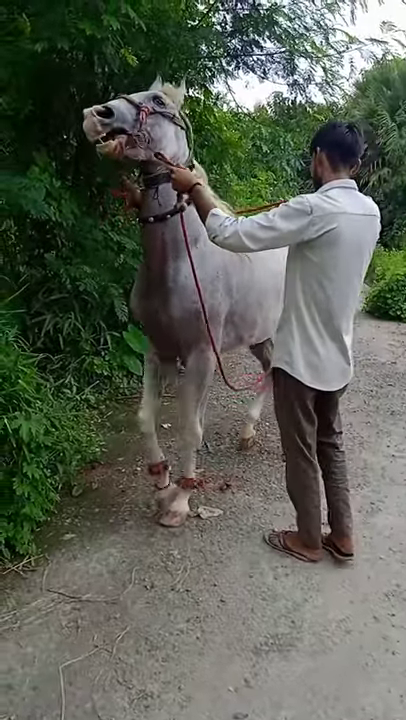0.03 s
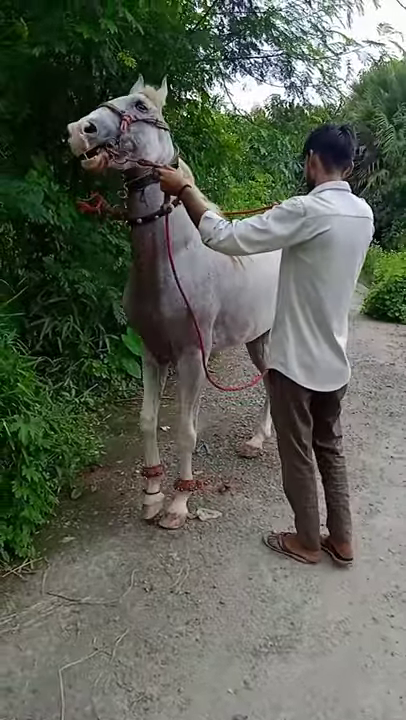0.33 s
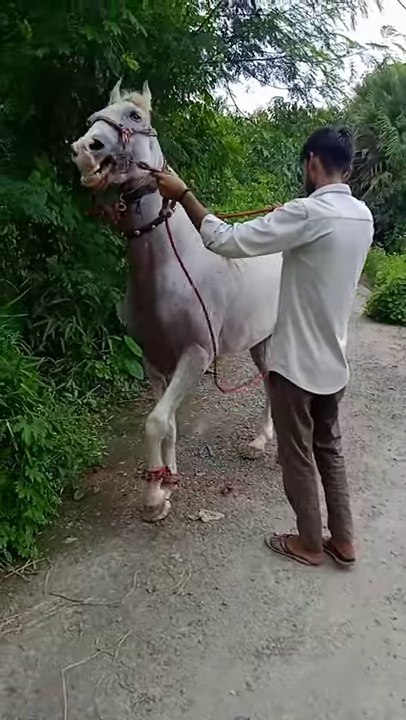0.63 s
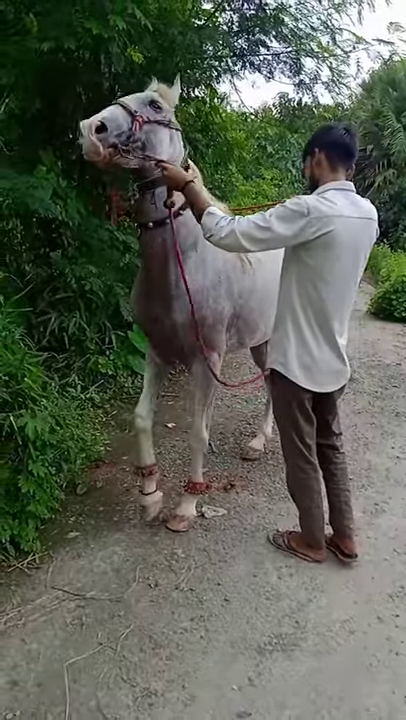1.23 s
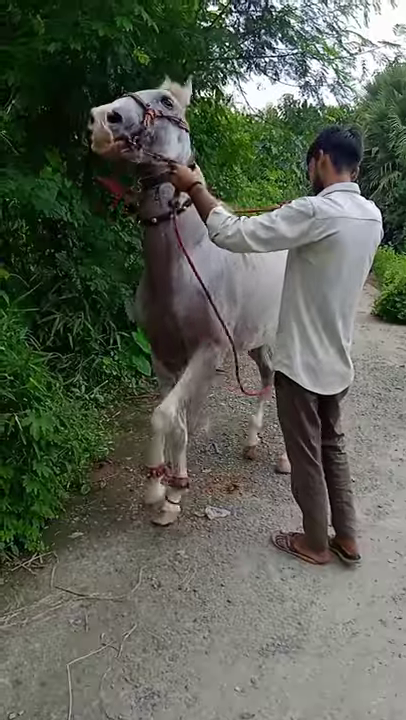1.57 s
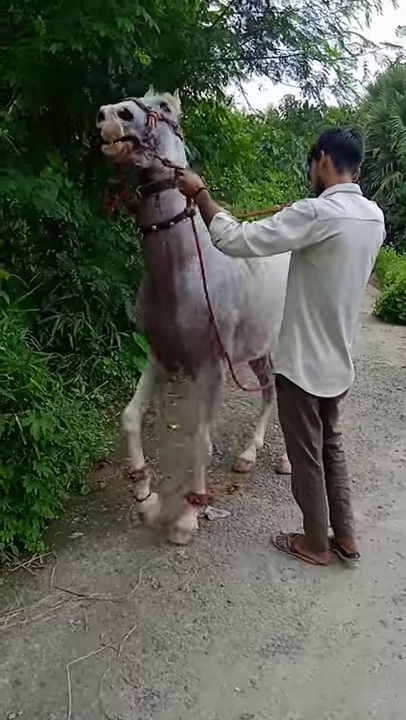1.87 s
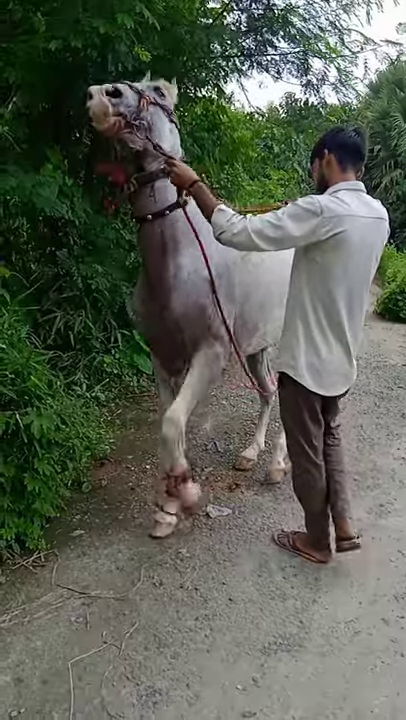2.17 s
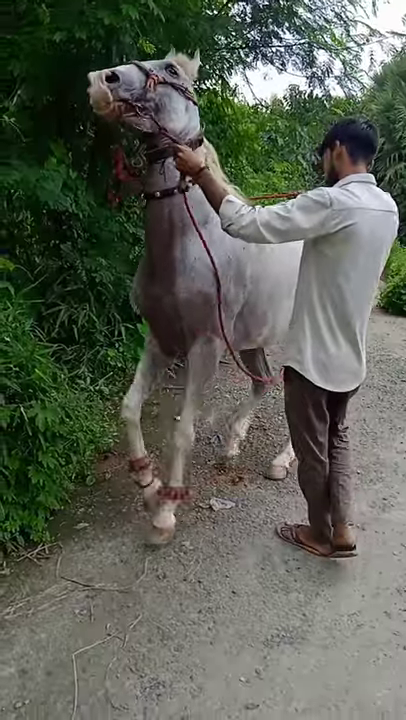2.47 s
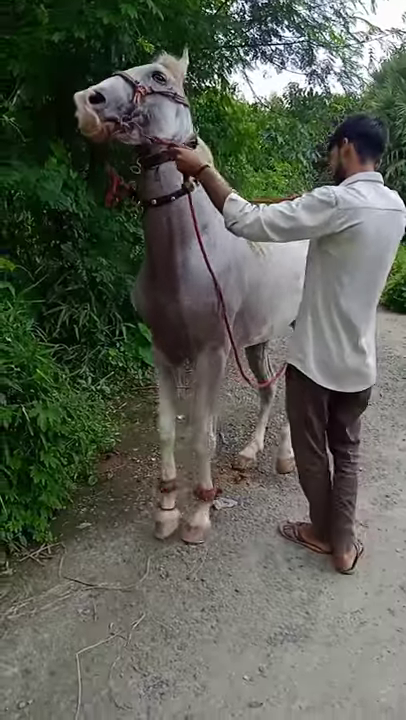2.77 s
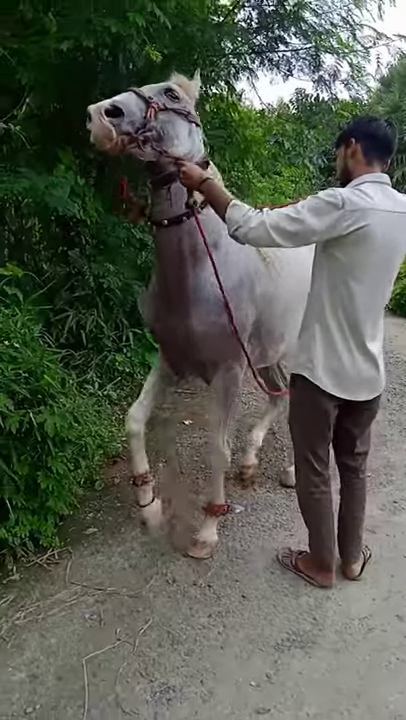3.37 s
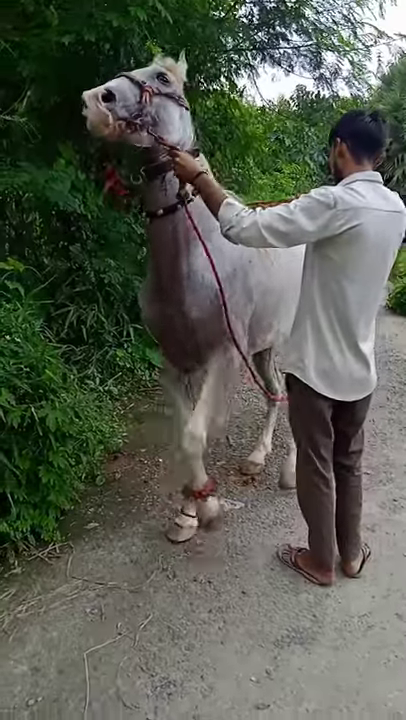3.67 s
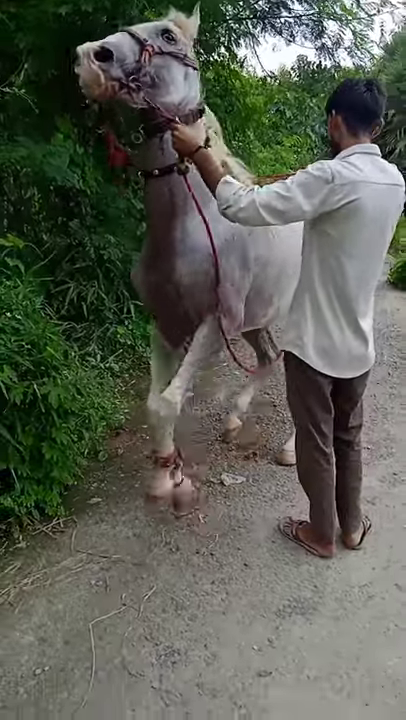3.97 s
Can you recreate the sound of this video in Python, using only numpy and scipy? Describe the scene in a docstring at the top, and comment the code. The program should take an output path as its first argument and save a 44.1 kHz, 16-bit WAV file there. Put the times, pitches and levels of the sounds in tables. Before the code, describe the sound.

Small bells on a prancing horse's legs jingle brightly throughout, in shakes about every 0.4 seconds. Hooves knock and scuff on a gritty path, lightly at first and firmer from 1.8 seconds. The bells clash harder at about 1.4 and 2.1 seconds. Short snorts follow the steps from 0.5 seconds on. A small stone clicks near 3.1 seconds. Faint high peeps and quiet open air lie behind.

```python
"""Small pellet bells jingle on the forelegs of a horse prancing on the spot on a gritty path.
Each step shakes the pellets against their shells; hard landings bang the bells together.
The hooves knock and scuff the grit, and the horse puffs short snorts in time with its steps.
Faint high peeps and quiet open air lie behind; bushes scatter a weak echo."""
import sys
import numpy as np
from scipy import signal
from scipy.io import wavfile
from scipy.ndimage import uniform_filter1d

SR = 44100
rng = np.random.default_rng(int(sys.argv[2]) if len(sys.argv) > 2 else 0)


def output_pcm(signal):
    """Save a mono or channel-first signal as 16-bit PCM at the path in sys.argv[1].

    Samples are clipped to [-1, 1] before scaling.
    """
    pcm = np.clip(np.atleast_2d(signal).T, -1, 1) * 32767
    wavfile.write(sys.argv[1], SR, np.round(pcm).astype(np.int16))


N = 176400

# strongest bell modes: f/Hz, level/dB
BELL_MODES = [(5210, -5), (5480, -15), (5890, -10), (6290, 1), (6480, 3.5), (6830, -1), (7100, 2),
              (7245, 0), (7420, 3.5), (7485, 5.5), (7740, -0.5), (7905, 5.5), (8120, 2.5), (8440, 2.5),
              (8660, 4), (8950, -1), (9250, -1), (9920, -3.5), (11250, -9.5), (12020, -16), (14050, -10),
              (14560, -12), (15000, -5), (15340, -3), (15700, 1.5)]
# envelope of the weaker shell modes: f/Hz, level/dB
SHELL_SPECTRUM = [(2000, -37), (3100, -27.5), (4000, -32), (5400, -18), (7800, -7.5), (11000, -31),
                  (13000, -26), (15700, -21)]
DETUNE_RATIO, BUILD_S, SHELL_T60_S = .004, .0011, .15


def amp(db):
    """Decibels to gain."""
    return 10 ** (np.asarray(db) / 20)


def unit(x):
    """Scale to rms 1."""
    return x / np.sqrt(np.mean(x ** 2) + 1e-20)


def burst(x):
    """Scale to rms 1 over the first 6 ms."""
    return x / np.sqrt(np.mean(x[:265] ** 2) + 1e-20)


def level_at(spectrum, hz):
    """Level in dB, interpolated over log frequency."""
    f, db = np.transpose(spectrum)
    return np.interp(np.log(hz + 1), np.log(f + 1), db)


def colour(x, spectrum):
    """Minimum-phase filter from (f/Hz, level/dB) points."""
    log_gain = np.log(amp(level_at(spectrum, abs(np.fft.fftfreq(2048, 1 / SR)))))
    taps = np.fft.ifft(np.exp(np.conj(signal.hilbert(log_gain)))).real
    return signal.oaconvolve(x, taps)[:len(x)]


def add(mix, start_s, sound):
    """Mix a sound in at start_s."""
    part = mix[max(round(start_s * SR), 0):][:len(sound)]
    part += sound[:len(part)]


def ring(t, hz, db, t60_s):
    """Sum of decaying modes of random polarity."""
    hz = np.atleast_1d(hz)[:, None]
    sign = rng.choice([-1, 1], hz.shape)
    decay = amp(np.reshape(db, (-1, 1)) - 60 * t / t60_s)
    return (sign * decay * np.sin(2 * np.pi * hz * t)).sum(0)


def shell(t, t60_s, tunings=(1,), modes=9):
    """Weak treble modes of one bell size; one row per bell, with its own tuning and weights."""
    hz = 2900 + 12900 * (np.arange(modes) + rng.random(modes)) / modes
    db = level_at(SHELL_SPECTRUM, hz)
    return np.array([ring(t, hz * k, db + 3 * rng.standard_normal(modes), t60_s) for k in tunings])


def shaking(rise_db=12.5, settle_s=.14, settle_db_per_s=121, idle_db=-58.5):
    """Jingle envelope: each shake swells, fades, then drops faster as the pellets come to rest."""
    # leg shakes: peak t/s, rise/s, level/dB, fade/(dB/s)
    shakes = [(.10, 0.049, -38.5, 54.5), (.19, 0.053, -53, 137), (0.562, 0.1, -40.5, 91),
              (.77, 0.13, -46, 175), (0.958, 0.08, -40, 167), (1.189, 0.11, -43, 148),
              (1.434, 0.014, -34, 155), (1.544, 0.042, -37, 75), (1.842, 0.044, -34.5, 58),
              (2.143, 0.0077, -31, 60), (2.492, 0.13, -43.5, 41), (2.618, 0.098, -34.5, 81),
              (2.928, 0.08, -39.5, 52), (3.26, .034, -47.5, 59), (3.346, 0.082, -34.5, 103.5),
              (3.419, 0.14, -47, 136), (3.713, 0.065, -33, 105.5), (3.945, 0.11, -44, 28)]
    t, power = np.arange(N) / SR, amp(idle_db) ** 2
    for peak_s, rise_s, db, fade_db_per_s in shakes:
        after_s = np.maximum(t - peak_s, 0)
        swell_db = -rise_db * np.maximum(peak_s - t, 0) / rise_s
        fade_db = fade_db_per_s * after_s + settle_db_per_s * np.maximum(after_s - settle_s, 0)
        power = power + amp(db + swell_db - fade_db) ** 2
    return np.sqrt(power)


def bouts(spread_db=5.5, step_s=.05):
    """Pellets rattle in bouts, passing energy between modes. Returns sample positions, mode gains."""
    knots = np.arange(0, N + SR, step_s * SR)
    gains = amp(spread_db * rng.standard_normal((len(BELL_MODES), len(knots))))
    mode_power = amp(np.array(BELL_MODES)[:, 1]) ** 2
    return knots, gains / np.sqrt(np.average(gains ** 2, axis=0, weights=mode_power))


def jingle(bells_per_size=4, peak_strikes_per_s=1400, spread_db=5, t60_s=.145, tick_db=-14, tick_s=.003):
    """Pellets strike their shells at random, more often and harder as the leg shakes."""
    t, force, out = np.arange(SR // 6) / SR, shaking(), np.zeros(N)
    rate = peak_strikes_per_s * np.sqrt(force / force.max())
    hits = np.flatnonzero(rng.random(N) < rate / SR)
    spread = unit(amp(spread_db * rng.uniform(-1, 1, N)))[hits]
    strength = spread * force[hits] * np.sqrt(SR / rate[hits])
    mode_of = rng.integers(0, len(BELL_MODES), N)[hits]
    bell_of = rng.integers(0, bells_per_size, N)[hits]
    ring_norm = np.linalg.norm(ring(t, BELL_MODES[0][0], 0, t60_s))
    knots, shares = bouts()
    for mode, (hz, db) in enumerate(BELL_MODES):
        offsets = np.linspace(-1, 1, bells_per_size) + .5 * rng.standard_normal(bells_per_size)
        tunings = 1 + DETUNE_RATIO * offsets  # bells of one size differ slightly in pitch
        rings = np.array([ring(t, hz * k, db, t60_s) for k in tunings]) + shell(t, SHELL_T60_S, tunings)
        tick = colour(rng.standard_normal(len(t)) * np.exp(-t / tick_s), SHELL_SPECTRUM)
        bells = rings * (1 - np.exp(-t / BUILD_S)) / ring_norm
        bells += amp(tick_db) * tick / np.linalg.norm(tick)
        struck = mode_of == mode
        gains = strength[struck] * np.interp(hits[struck], knots, shares[mode])
        for hit, bell, gain in zip(hits[struck], bell_of[struck], gains):
            add(out, hit / SR, gain * bells[bell])
    return amp(-1) * out


def air(db=-65, swell_db=1.6, step_s=.09):
    """Quiet outdoor noise, wavering slightly."""
    # background spectrum: f/Hz, level/dB
    spectrum = [(25, -8), (60, -0.5), (110, 4.5), (220, 2.5), (450, -5.5), (2000, -2), (4000, -12),
                (9000, -2.5), (15500, -23.5)]
    knots = np.arange(0, N + SR, step_s * SR)
    swell = np.interp(np.arange(N), knots, amp(swell_db * rng.standard_normal(len(knots))))
    return amp(db) * swell * unit(colour(rng.standard_normal(N), spectrum))


def scuff(length_s, db, grains_per_s=700, spread_db=4.5):
    """Grit crunches under a sliding hoof."""
    # grit spectrum: f/Hz, level/dB
    grit = [(40, -31), (300, 1), (470, -7.5), (800, 6), (1300, 0), (2000, -2.5), (2700, 3), (3500, -9.5),
            (6000, -7), (15000, -69)]
    n = SR // 5
    progress = np.minimum(np.arange(n) / SR / length_s, 1)
    grains = rng.standard_normal(n) * amp(spread_db * rng.standard_normal(n))
    grains *= rng.random(n) < grains_per_s / SR
    crunch = colour(grains * np.sqrt(abs(np.sin(np.pi * progress))), grit)
    return amp(db) * crunch / np.linalg.norm(crunch) * np.sqrt(length_s * SR)


def crash(db, count=50, decay_s=.059, t60_s=.031):
    """Shells bang together and damp each other: short bright rings, thickest at the landing."""
    t, out = np.arange(SR // 20) / SR, np.zeros(SR // 4)
    for start_s in .2 * ((np.arange(count) + rng.random(count)) / count) ** 2:
        add(out, start_s, np.exp(-start_s / decay_s) * unit(shell(t, t60_s)[0]))
    return amp(db) * out / np.linalg.norm(out) * np.sqrt(decay_s * SR)


def knock(thud_db, clop_db, crack_db, clop_hz, thud_hz=281, thud_s=.0025, clop_s=.0026, crack_s=.0048):
    """A hoof lands: the ground thuds, the hoof wall clops, grit cracks."""
    # cracking grit: f/Hz, level/dB
    crack_spectrum = [(60, -41), (300, -15.5), (1000, -10.5), (2600, 3.5), (3400, -4.5), (7000, -7),
                      (15000, -24)]
    thud_band = [(40, -18.5), (120, 1.5), (300, -12.5), (600, -12.5), (2000, -65.5)]
    clop_band = [(clop_hz / 2, -18), (clop_hz, 0), (clop_hz * 2, -18), (8000, -50)]
    t = np.arange(SR // 10) / SR
    thud_noise, clop_noise, crack_noise = rng.standard_normal((3, len(t)))
    thud = burst(np.sin(2 * np.pi * thud_hz * t) * np.exp(-t / thud_s))
    thud += .9 * burst(colour(thud_noise * np.exp(-t / thud_s), thud_band))
    thud = colour(thud, [(50, -26.5), (220, 5), (360, 9.5), (520, -4.5)])
    clop = burst(np.sin(2 * np.pi * clop_hz * t) * np.exp(-t / clop_s))
    clop += .9 * burst(colour(clop_noise * np.exp(-t / crack_s), clop_band))
    clop = colour(clop, [(100, -17), (450, -12), (700, -1), (1500, 1.5), (2500, -22)])
    first_contact = 8 * (t == 0)
    crack = colour(crack_noise * np.exp(-t / crack_s) + first_contact, crack_spectrum)
    return amp(thud_db) * burst(thud) + amp(clop_db) * burst(clop) + amp(crack_db) * burst(crack)


def peep(db, centre_hz=3060, length_s=.034, flutter_depth=.56):
    """Short, soft, fluttering whistle."""
    t = np.arange(0, length_s, 1 / SR)
    flutter = 1 + flutter_depth * unit(uniform_filter1d(rng.standard_normal(len(t)), size=200))
    hz = centre_hz * (1 + DETUNE_RATIO * rng.standard_normal())
    return amp(db) * np.sin(np.pi * t / length_s) * unit(flutter) * np.sin(2 * np.pi * hz * t)


def clink(hz, db, t60_s=.12, shell_db=-6):
    """One pellet hits hard; its bell beats between two close modes."""
    t = np.arange(SR // 4) / SR
    bell = ring(t, [hz, hz * (1 + 2 * DETUNE_RATIO)], [0, -10], t60_s)
    bell += amp(shell_db) * shell(t, SHELL_T60_S)[0]
    bell *= 1 - np.exp(-t / BUILD_S)
    return amp(db) * bell / np.sqrt(np.mean(bell[:SR // 100] ** 2))


def snort(length_s, db):
    """Short puff of air through the nostrils."""
    # nostril resonances: f/Hz, level/dB
    nostrils = [(100, -36.5), (330, -24.5), (500, -35.5), (720, -22), (1050, -34), (1400, -12.5),
                (1650, -14.5), (2050, -36.5), (4100, -32), (4520, -23.5), (5200, -47), (12000, -47)]
    progress = np.minimum(np.arange(SR // 8) / SR / length_s, 1)
    breath = unit(colour(rng.standard_normal(len(progress)), nostrils))
    return amp(db) * np.sin(np.pi * progress ** .73) * breath


def snap(db, decay_s=.0048):
    """A small stone snaps under a hoof: a bright, hard click."""
    t = np.arange(SR // 20) / SR
    click = rng.standard_normal(len(t)) * np.exp(-t / decay_s)
    return amp(db) * burst(colour(click, [(100, -59), (2000, -59), (9000, 2)]))


def bushes(x, db=-12.5, t60_s=.2, delay_s=.005):
    """Weak, short scatter from foliage."""
    t = np.arange(SR // 2) / SR
    reflections = rng.standard_normal(len(t)) * (rng.random(len(t)) < .06)
    tail = reflections * amp(-60 * t / t60_s) * (t > delay_s)
    return amp(db) * signal.oaconvolve(x, tail / np.linalg.norm(tail))[:N]


def scene():
    """Bells, hooves, snorts and peeps in the open air; mono."""
    # hoof scrapes: t/s, length/s, level/dB
    scuffs = [(.03, 0.077, -57), (.435, 0.062, -55.5), (.925, 0.063, -57), (1.395, 0.057, -51.5),
              (1.81, 0.041, -54), (2.14, 0.056, -52), (2.578, 0.081, -46.5), (2.78, 0.043, -62),
              (2.87, 0.053, -53), (3.30, .075, -48), (3.655, 0.097, -55.5)]
    # bells colliding on hard landings: t/s, level/dB
    crashes = [(.065, -49), (1.428, -42.5), (2.141, -38)]
    # hoof landings: t/s, thud/dB, clop/dB, crack/dB, clop f/Hz
    knocks = [(.181, -55.5, -53, -51.5, 940), (.535, -59, -55, -53, 1620), (.790, -47, -49.5, -64, 900),
              (1.149, -55, -53.5, -56, 940), (1.590, -47.5, -47.5, -55, 930), (1.802, -55, -35, -42, 820),
              (1.823, -57, -43.5, -48, 880), (1.897, -47.5, -43.5, -46.5, 940), (2.297, -46, -43, -51, 900),
              (2.333, -59, -43, -44, 1150), (2.576, -53, -32, -37, 915), (2.618, -43, -40, -44.5, 850),
              (2.902, -71, -45.5, -44, 980), (3.077, -61, -51.5, -49.5, 830),
              (3.171, -59, -38, -42.5, 1350), (3.303, -57, -42.5, -44, 804),
              (3.568, -55.5, -42, -47.5, 1024), (3.679, -82, -45, -50, 864),
              (3.846, -47.5, -44.5, -48, 900)]
    # faint whistles: t/s, level/dB
    peeps = [(.2, -56.5), (1.08, -52.5), (1.355, -60), (1.905, -49), (2.4, -59), (2.64, -55),
             (3.625, -58.5), (3.8, -57)]
    # hard pellet hits: t/s, f/Hz, level/dB
    clinks = [(.362, 7480, -58), (.492, 7870, -34.5), (.495, 7400, -41), (1.243, 7463, -41),
              (1.396, 7420, -58), (1.434, 7900, -34.5), (1.997, 8660, -37.5), (2.141, 7550, -36.5),
              (2.145, 9880, -32), (2.191, 7500, -32), (2.234, 9920, -44)]
    # nostril puffs: t/s, length/s, level/dB
    snorts = [(.45, 0.02, -50.5), (.885, 0.022, -49.5), (1.295, 0.035, -43.5), (1.738, 0.042, -46.5),
              (1.822, 0.023, -44.5), (2.152, 0.034, -43), (2.549, 0.062, -45), (2.94, 0.038, -44.5),
              (3.34, 0.035, -41), (3.70, 0.033, -43)]
    # snapping stone: t/s, level/dB
    snaps = [(3.077, -40)]
    mix = jingle()
    for events, source in [(clinks, clink), (crashes, crash), (knocks, knock), (snaps, snap),
                           (scuffs, scuff), (snorts, snort), (peeps, peep)]:
        for start_s, *settings in events:
            add(mix, start_s, source(*settings))
    return (mix + bushes(mix) + air())[None]


def record(dry):
    """Bass cut, then band limit."""
    bass_cut_hz, edge_hz = 70, 15850
    thin = signal.lfilter(*signal.butter(2, bass_cut_hz, "highpass", fs=SR), dry)
    lowpass = signal.firwin(511, edge_hz, window=("kaiser", 8), fs=SR)
    return signal.oaconvolve(thin, lowpass[None], "same")


dry = scene()
out = record(dry)
output_pcm(out)
```